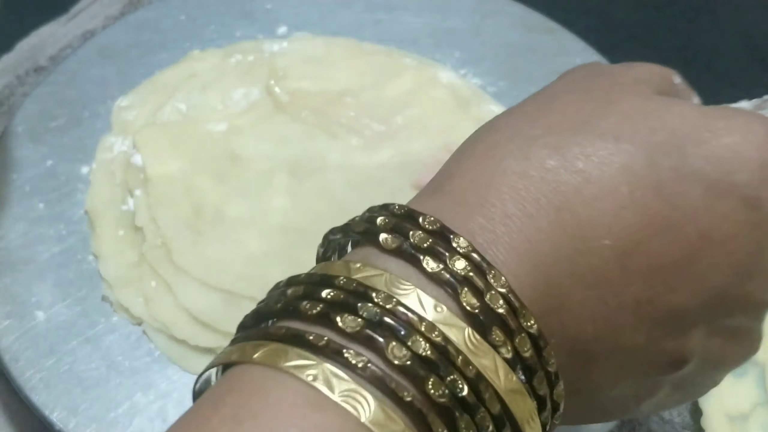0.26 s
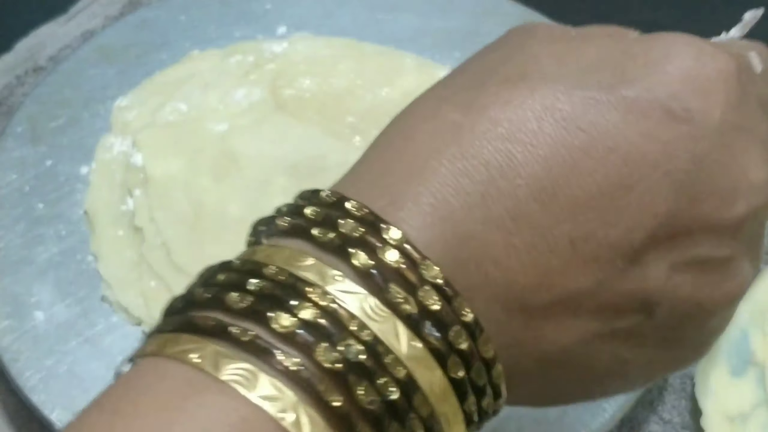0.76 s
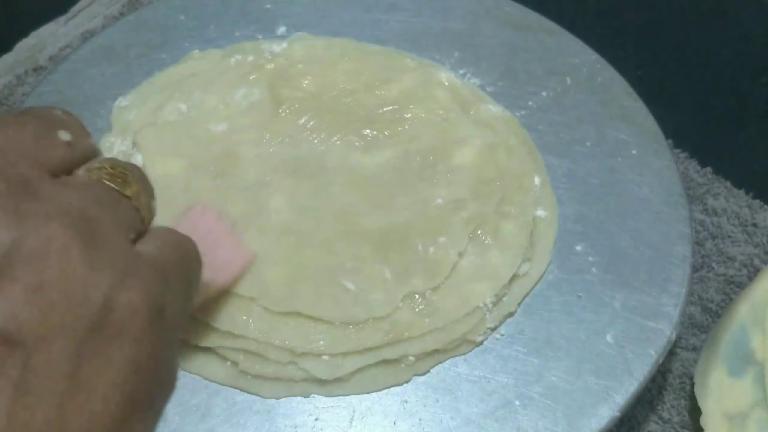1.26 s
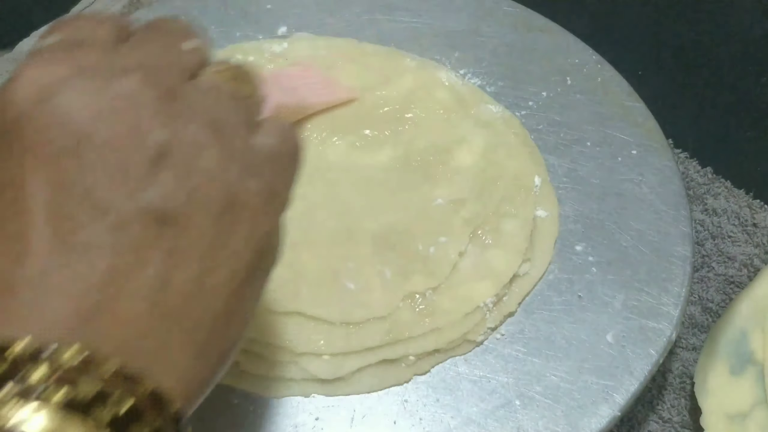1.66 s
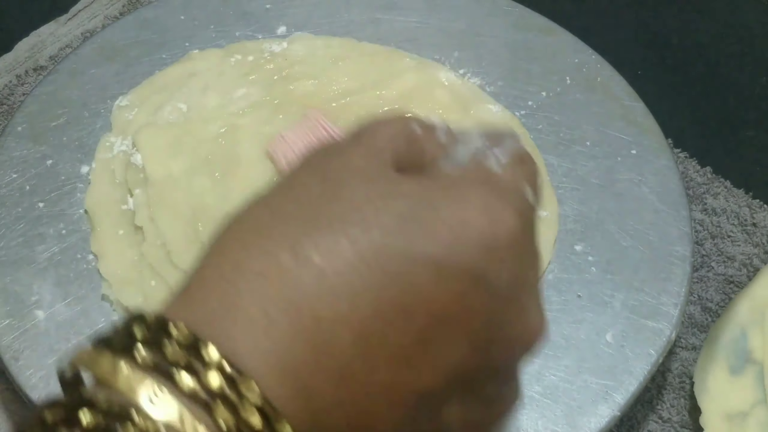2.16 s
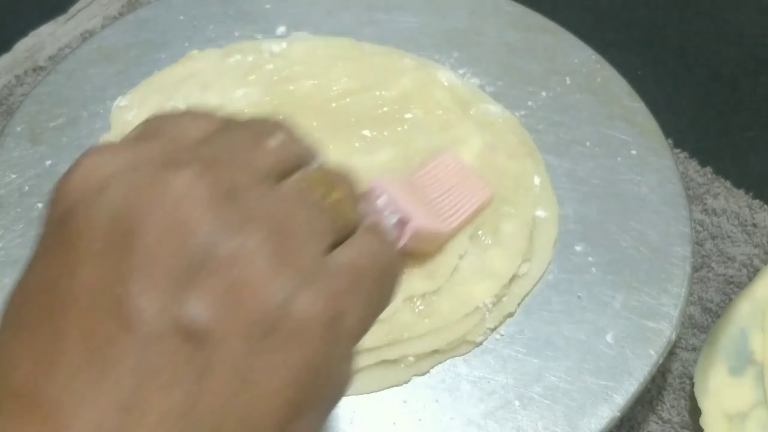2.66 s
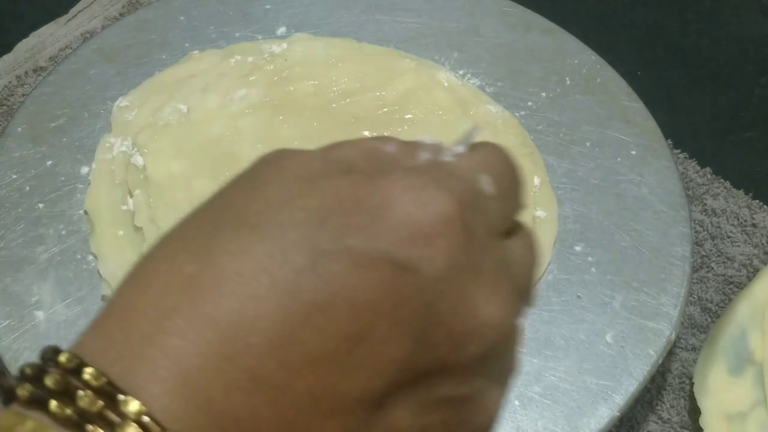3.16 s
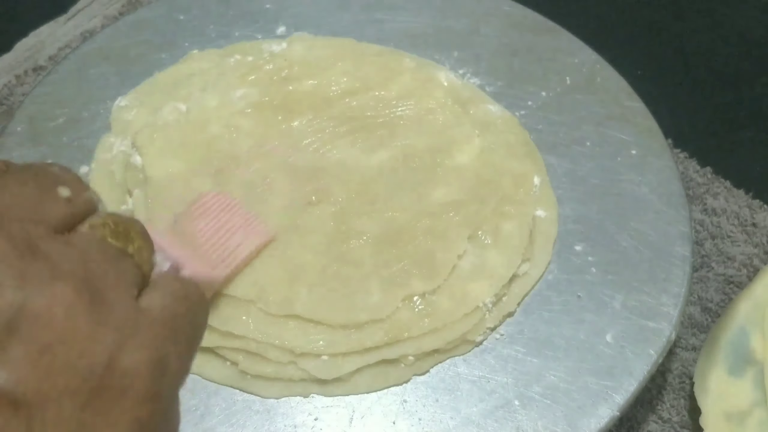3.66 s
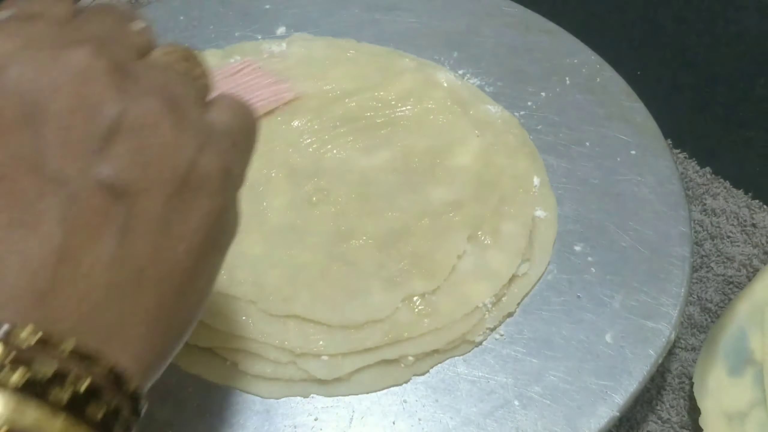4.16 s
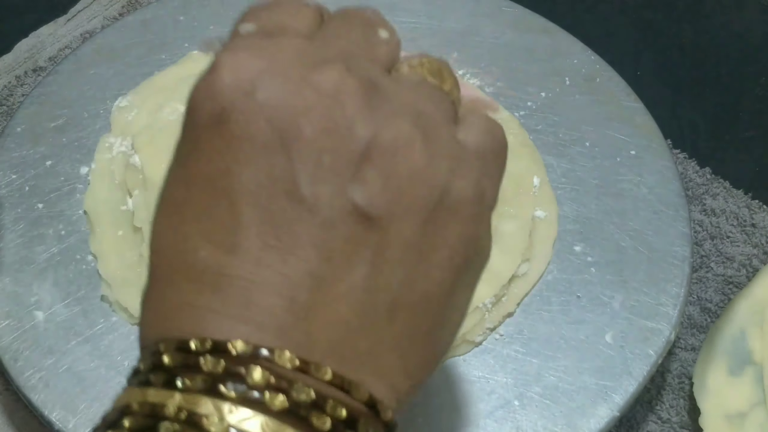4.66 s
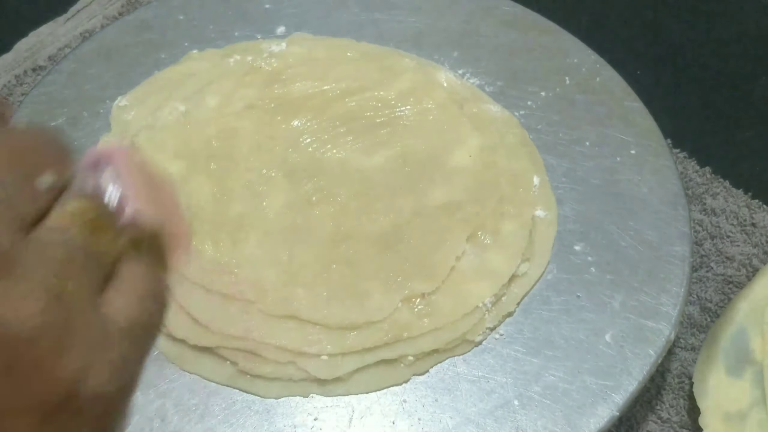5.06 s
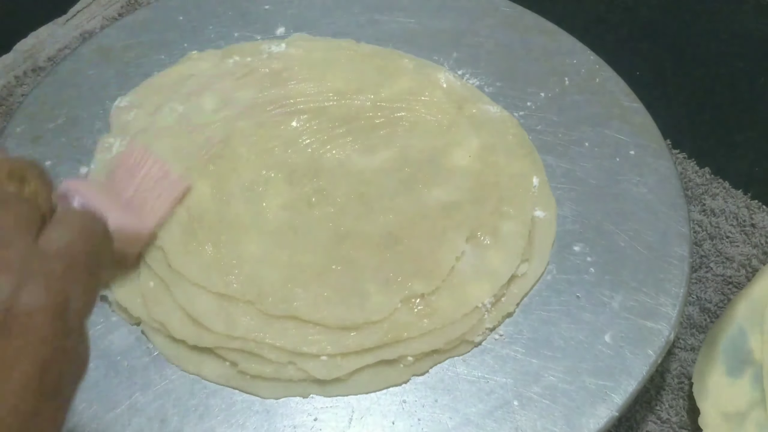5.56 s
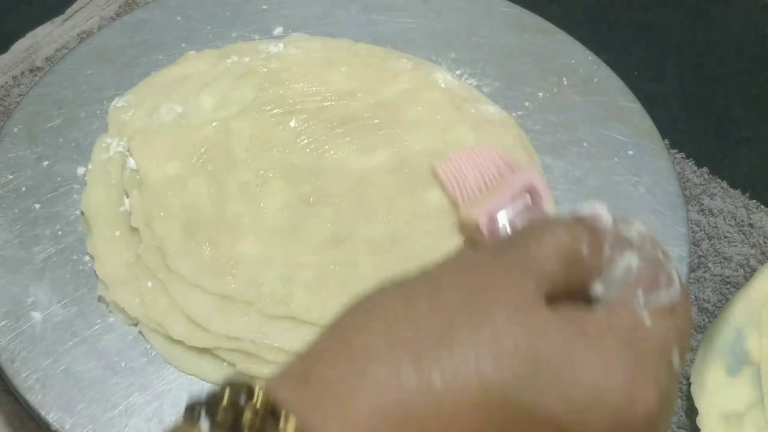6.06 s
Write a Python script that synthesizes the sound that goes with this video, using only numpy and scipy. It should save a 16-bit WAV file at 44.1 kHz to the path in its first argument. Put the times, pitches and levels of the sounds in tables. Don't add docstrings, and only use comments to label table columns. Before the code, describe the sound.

A hand brushes something soft and its stacked bangles clatter in irregular, tight, high metallic clicks, quickly damped by skin. Under them come gentle bristle strokes, occasional dull handle ticks and two soft low bumps on the tray. A quiet outdoor rumble swells and fades with a wavering low drone. Heard close on a phone in a small hard room, left side crisp, right side duller, slightly gated treble.

```python
import sys
import numpy as np
from scipy import signal
from scipy.fft import rfft, irfft, next_fast_len
from scipy.io import wavfile
from scipy.ndimage import uniform_filter1d

SR = 44100
rng = np.random.default_rng(int(sys.argv[2]) if len(sys.argv) > 2 else 0)


def master_out(mix):
    frames = np.transpose(np.atleast_2d(mix))
    ceiling = np.clip(frames, -1, 1)
    pcm = np.round(ceiling * 32767).astype(np.int16)
    wavfile.write(sys.argv[1], SR, pcm)


def magnitude_from_level(level_db):
    exponent = np.asarray(level_db, float) / 20
    return 10 ** exponent


N = 278883

# pitch in Hz, strength in dB per Hz.
RUMBLE_COLOUR = [(20, -13.5), (36, -36.5), (50, -10.5), (105, -2.5), (150, -6.5), (210, -1.5), (300, -12),
                 (400, -7.5), (650, -10), (1300, -21.5), (2500, -31), (5000, -41), (9000, -39.5),
                 (16000, -44)]
RUMBLE_DB = -50.5
# pitch in Hz, likeness from 0 to 1.
RUMBLE_LIKENESS = [(30, 0.74), (90, 0.98), (290, 0.89), (640, 0.53), (1400, 0), (16000, 0.0)]
# pitch in Hz, width in Hz, lift in dB.
ROOM_TONES = [(44, 29, 10.5), (106.7, 10, 5.5), (135.4, 6.8, 9), (182.3, 4.5, 5.5), (209.8, 5.7, 5.5),
              (236.8, 6.5, 8.5), (371, 13, 3.5), (386, 8.2, 3)]
# start in seconds, level in dB over the steady rumble,
# onset in seconds, release in seconds; the "start" is the loudest moment.
TRAFFIC_SWELLS = [
    (0.0, 4, .05, 0.036),
    (0.85, -2, 0.42, .4),
    (2.0, -4, 0.5, 0.53),
    (3.9, -6.5, 1, 0.3),
    (5.6, -1, 0.37, .4),
]
# time in seconds, pitch in Hz, level in dB.
DRONE_PATH = [(0.0, 78.3, -51.5), (0.37, 84.3, -64), (0.95, 88.4, -82), (1.5, 86, -82), (1.85, 86.3, -51.5),
              (2.09, 86.6, -64), (2.55, 83.9, -53.5), (2.8, 81.7, -58), (3.24, 88.9, -63.5),
              (3.48, 83.8, -53.5), (3.6, 77.4, -70), (3.86, 76.6, -55.5), (4.0, 86.7, -54.5),
              (4.35, 87.3, -45.5), (4.66, 87.2, -66.5), (5.0, 87.3, -52.5), (6.0, 85.5, -59),
              (6.32, 86.2, -66)]
DRONE_FLUTTER_DB, DRONE_WAVER = 3.5, 0.026

# loudest moment in seconds, level in dB, onset and release in seconds.
SLEEVE_SHIFTS = [
    (0.0, -60.5, .1, 0.13),
    (2.7, -73, 0.76, 0.12),
    (4.59, -67, 0.21, 0.18),
    (5.61, -65.5, 0.19, 0.28),
]
RUSTLE_REST_DB = -72
# pitch in Hz, strength in dB.
RUSTLE_COLOUR = [(500, -32.5), (1500, -5), (3000, -2), (5500, -7), (8500, -32.5), (20000, -34)]
# start in seconds, peak in dB, pitch in Hz, fall by 60 dB in seconds.
HANDLE_TICKS = [
    (0.0094, -61, 3070, 0.03),
    (2.393, -48, 5370, 0.022),
    (4.498, -46, 3950, 0.093),
    (4.5925, -51, 4100, 0.033),
    (5.7693, -56, 3108, 0.031),
]
# start in seconds, peak in dB, pitch in Hz, fall by 60 dB in seconds.
TRAY_BUMPS = [
    (3.791, -37, 97.4, 0.16),
    (5.981, -43, 96, 0.14),
]

BANGLES = 5
POSES = 4
# pitch in Hz, strength in dB, fall by 60 dB in seconds.
HIGH_MODES = [(10500, -4, .014), (11230, -18.5, 0.0028), (11180, 1.5, 0.024), (11900, -4.5, 0.035),
              (11900, -1.5, 0.012), (12230, -6.5, 0.018), (12500, -7.5, 0.019), (12800, -1.5, 0.026),
              (13300, -7, 0.013), (12480, -13.5, 0.0091), (13760, -3, 0.025), (13450, -7.5, 0.037),
              (14500, -8.5, 0.0099), (15720, 5, .01)]
# pitch in Hz, strength in dB, fall by 60 dB in seconds.
LOW_MODES = [(1990, -10, 0.039), (2330, -12.5, 0.067), (3035, -10, 0.018), (3615, 1.5, 0.0067),
             (4223, -3, 0.027), (4806, -5, 0.048), (5430, 2, 0.061), (5887, 6, 0.053), (6583, 10, 0.011),
             (6900, 2.5, 0.03), (7430, -4.5, 0.026), (8470, -4, 0.0092)]
# start in seconds, peak in dB,
# lower tones in dB against the peak, pitch of the struck bangle in Hz.
SLAMS = [(0.0748, -30.5, -19.5, 10960), (0.357, -25.5, -18, 11170), (0.829, -19.5, -24.5, 11180),
         (1.0237, -20, -29, 11300), (1.3473, -22, -29, 12600), (1.3787, -14.5, -26.5, 11220),
         (1.5592, -14.5, -29, 10500), (1.5878, -23, -20, 11500), (1.5938, -14, -23.5, 12800),
         (1.9513, -14.5, -29.5, 12140), (1.9584, -16, -26, 11900), (2.1489, -18.5, -26, 12300),
         (2.3909, -25.5, -31, 11320), (2.593, -12, -27, 12500), (2.6154, -23, -22.5, 12000),
         (3.083, -21.5, -27.5, 10780), (3.4291, -19.5, -24.5, 13300), (3.4722, -14.5, -23.5, 14500),
         (3.7903, -9.5, -32, 12230), (3.998, -18.5, -28.5, 12600), (4.01, -13.5, -34.5, 15870),
         (4.4797, -15.5, -28, 11100), (4.6354, -21, -29, 10600), (4.6668, -23.5, -22, 12530),
         (4.9396, -25, -24.5, 11030), (5.2777, -20, -29.5, 12970), (5.3125, -23, -21, 11760),
         (5.6824, -11, -29, 11660), (5.937, -17.5, -26.5, 13300), (6.2613, -20.5, -30.5, 11440)]
# start in seconds, peak in dB, #
# lower tones in dB against the peak.
BOUNCES = [(0.3532, -36, -28), (1.0285, -28, -18), (1.3605, -39, -20), (2.1383, -28.5, -25),
           (2.1574, -25, -23), (2.58, -28, -22), (2.5865, -23, -22.5), (2.6129, -21.5, -23.5),
           (3.0923, -27, -22), (3.4347, -17.5, -46), (3.4836, -25, -25), (3.4906, -28, -24),
           (3.4977, -24, -21), (3.749, -27.5, -31), (3.802, -30, -14), (4.006, -18.5, -26),
           (4.0221, -15.5, -25.5), (4.033, -22, -25.5), (4.6707, -25.5, -22), (4.695, -26.5, -21),
           (4.702, -32, -35), (4.9449, -25.5, -33), (5.2863, -26, -19.5), (5.31, -22.5, -28),
           (5.658, -29, -24), (5.6924, -20.5, -20.5), (5.928, -37.5, -16), (5.9429, -27, -26),
           (5.97, -33.5, -17), (6.272, -21.5, -25)]
# start in seconds, peak in dB.
TOUCHES = [(0.0498, -40.5), (0.057, -37), (0.0839, -36), (0.3813, -40), (0.5032, -33.5), (0.523, -38.5),
           (0.604, -28.5), (0.647, -40), (1.011, -31), (1.3942, -30), (1.406, -42), (1.5483, -39),
           (1.873, -41.5), (2.1224, -38), (2.2477, -43), (2.2644, -37.5), (2.571, -35), (2.7846, -36.5),
           (2.7934, -39), (3.152, -45), (3.1874, -35), (3.2833, -34), (3.437, -34), (3.7359, -36.5),
           (3.8145, -47), (4.489, -33), (5.427, -41), (5.4649, -32.5), (5.9212, -34), (5.962, -31),
           (0.102, -55), (0.967, -49), (1.039, -31), (1.3004, -44), (1.8922, -48), (2.0586, -43),
          (2.259, -42), (2.2775, -43), (2.3799, -37), (2.7987, -36), (2.8476, -47), (3.1741, -40),
          (3.208, -45), (3.45, -37), (3.587, -47), (3.6086, -48), (3.7568, -50), (4.4422, -45),
          (4.9236, -48), (4.962, -44), (5.3926, -44), (5.6491, -35)]
TOUCH_LOW_DB, TOUCH_LOW_SLOPE = -22.5, -0.37
SLAM_RING_MS, BOUNCE_RING_MS, TOUCH_RING_MS, RING_SPREAD = 19, 14, 15, 0.19
SNAP_DB, LOW_SNAP_DB, SNAP_S = 1.5, -10, .002
# pitch in Hz, fall by 60 dB in seconds.
KITCHEN_DECAY = [(1000, 1), (5000, 0.57), (10000, 0.26), (16000, 0.5)]

# moment of most pressure in seconds, level in dB, onset and release in seconds.
BRUSH_STROKES = [(0.42, -70, 0.22, 0.08), (0.72, -52, 0.12, 0.077), (1.3, -58, .6, .08),
                 (1.75, -56, 0.25, 0.37), (2.25, -49.5, .1, 0.11), (2.73, -55, .15, 0.15),
                 (3.68, -52.5, 0.14, 0.13), (4.05, -61, 0.17, 0.37), (4.5, -52.5, 0.67, 1),
                 (5.05, -83, 0.46, 0.35), (5.49, -51.5, 0.13, 0.31), (6.05, -56, .11, .23)]
BRUSH_REST_DB = -77.5
# pitch in Hz, strength in dB.
BRUSH_COLOUR = [(1500, -42), (2500, -14.5), (6000, -3.5), (8500, -8), (11000, -8.5), (15000, -2.5),
                (20000, 6)]

# pitch in Hz, strength in dB.
MIC_LEFT = [(20, 0.5), (7000, 0), (8300, 3), (9000, -16), (9800, -4.5), (10400, 6.5), (15500, 9.5),
            (20000, -1)]
# pitch in Hz, strength in dB.
MIC_RIGHT = [(20, 0), (7000, -1), (8300, 2.5), (9200, 0.5), (9850, 0.5), (10400, -7), (12500, -3.5),
             (15500, -11.5), (20000, 23.5)]
TOP_HZ = 15500


def along(table, t):
    s, *columns = np.transpose(table)
    return [np.interp(t, s, c) for c in columns]


def over_hz(table, size):
    hz, value = np.transpose(table)
    bins_hz = np.arange(size // 2 + 1) * SR / size
    return np.interp(np.log(bins_hz + 1), np.log(hz), value)


def colour(x, table):
    size = 2 * next_fast_len(len(x) // 2 + 2048)
    ceps = irfft(np.log(magnitude_from_level(over_hz(table, size))), size)
    ceps[1:size // 2] *= 2
    ceps[size // 2 + 1:] = 0
    response = np.exp(rfft(ceps))
    return irfft(rfft(x, size) * response, size)[:len(x)]


def level(x, db):
    return x * magnitude_from_level(db) / np.sqrt(np.mean(x ** 2))


def walk(rate):
    k = int(SR / rate)
    steps = np.repeat(rng.standard_normal(N // k + 1), k)
    return uniform_filter1d(uniform_filter1d(steps, k), k)[:N]


def strokes(table, rest_db):
    s, db, onset, release = np.transpose(table)[:, :, None]
    t = np.arange(N) / SR - s
    away = np.where(t < 0, -t / np.maximum(onset, .01), t / np.maximum(release, .01))
    power = (magnitude_from_level(db - 12 * away) ** 2).sum(axis=0)
    return np.sqrt(magnitude_from_level(rest_db) ** 2 + power)


def rumble():
    alike = np.clip(over_hz(RUMBLE_LIKENESS, N), 0, 1)
    bins_hz = np.arange(N // 2 + 1) * SR / N
    tones_db = sum(db / (1 + (2 * (bins_hz - hz) / width) ** 2) for hz, width, db in ROOM_TONES)
    mid, side = rfft(rng.standard_normal((2, N))) * magnitude_from_level(over_hz(RUMBLE_COLOUR, N) + tones_db)
    mid = irfft(mid * np.sqrt(1 + alike), N)
    side = irfft(side * np.sqrt(1 - alike), N)
    steady = level(np.array([mid + side, mid - side]), RUMBLE_DB)
    return steady * strokes(TRAFFIC_SWELLS, 0)


def drone():
    hz, db = along(DRONE_PATH, np.arange(N) / SR)
    wavering_hz = hz * (1 + DRONE_WAVER * walk(20))
    tone = np.sin(2 * np.pi * np.cumsum(wavering_hz) / SR)
    return np.sqrt(2) * tone * magnitude_from_level(db + 1.5 + DRONE_FLUTTER_DB * walk(14))


def rustle():
    grain = magnitude_from_level(3 * walk(150) + 1.5 * walk(12))
    hiss = rng.standard_normal((2, N)) * grain
    cloth = np.array([level(colour(h, RUSTLE_COLOUR), 0) for h in hiss])
    return cloth * strokes(SLEEVE_SHIFTS, RUSTLE_REST_DB) * magnitude_from_level(4.5)


def knocks(table, spread):
    out, t = np.zeros(N + SR), np.arange(SR // 4) / SR
    for (s, db, hz, t60), c in zip(table, rng.standard_normal((len(table), 5, 1))):
        tones = np.sin(2 * np.pi * hz * (1 + spread * c) * t).sum(axis=0)
        i = int(s * SR)
        out[i:i + len(t)] += magnitude_from_level(db - 11.5) * tones * np.exp(-np.log(1000) * t / t60)
    return out[:N]


def contacts():
    slam_s, slam_hz = np.transpose(SLAMS)[[0, 3]]

    def near_hz(s):
        return slam_hz[np.abs(slam_s - s).argmin()]

    rows = [(*r, SLAM_RING_MS) for r in SLAMS]
    rows += [(*r, near_hz(r[0]), BOUNCE_RING_MS) for r in BOUNCES]
    for s, db in TOUCHES:
        low_db = TOUCH_LOW_DB + TOUCH_LOW_SLOPE * (db + 38)
        rows.append((s, db, low_db, near_hz(s), TOUCH_RING_MS))
    luck = rng.standard_normal(len(rows))
    return [(*r[:-1], r[-1] * np.exp(RING_SPREAD * g)) for r, g in zip(rows, luck)]


def ring(modes, chance, lift_db, free, scatter_db, detune, snap_db):
    hz, db, t60 = np.tile(np.transpose(modes), BANGLES)[:, :, None]
    t = np.arange(int(.028 * SR)) / SR
    gain = magnitude_from_level(db + np.tile(lift_db, BANGLES)[:, None] + scatter_db * chance[0])
    phase = 2 * np.pi * (hz * (1 + detune * chance[1]) * t + chance[2])
    fade = np.exp(-np.log(1000) * t / (free * t60))
    y = (gain * fade * np.sin(phase)).sum(axis=0)
    y = y * (1 + magnitude_from_level(snap_db) * np.exp(-t / SNAP_S))
    return y * np.minimum(t / 0.0004, 1) / np.sqrt((gain ** 2).sum())


def bangles():
    high, low = BANGLES * len(HIGH_MODES), BANGLES * len(LOW_MODES)
    clinks = contacts()
    chance = rng.standard_normal((len(clinks), 2, 3, high + low, 1))
    chance[:, 1, 1] = chance[:, 0, 1]
    cracks = rng.standard_normal((len(clinks), 2, 256))
    crack_fade = np.exp(-np.arange(256) / (.002 * SR))
    out = np.zeros((POSES, 2, N + SR // 10))
    for k, ((s, db, low_db, hz, ring_ms), c, crack) in enumerate(zip(clinks, chance, cracks)):
        lift_db = 7 * np.exp(-((np.array(HIGH_MODES)[:, 0] - hz) / 300) ** 2)
        free = np.clip(ring_ms / 26, .2, 2)
        for side, (shade_db, lag) in enumerate([(-2.0, 10 // 20), (-16, 10)]):
            bright = ring(HIGH_MODES, c[side, :, :high], lift_db, free,
                          scatter_db=3.0, detune=0.03, snap_db=SNAP_DB)
            dull = ring(LOW_MODES, c[side, :, high:], np.zeros(len(LOW_MODES)), free,
                        scatter_db=1, detune=0.0394, snap_db=LOW_SNAP_DB)
            y = magnitude_from_level(shade_db - 5.5) * bright + magnitude_from_level(low_db + 7.0) * dull
            y[:256] += magnitude_from_level(low_db) * crack[side] * crack_fade
            i = int(s * SR) + lag
            out[k % POSES, side, i:i + len(y)] += magnitude_from_level(db) * y
    return out[:, :, :N].sum(axis=0), out[:, 0, :N]


def kitchen(poses, wet_db, early_db, early_s):
    t = np.arange(int(.5 * SR)) / SR
    decay_hz, decay_s = np.transpose(KITCHEN_DECAY)
    tail = 0
    for lo in 1000 * 2. ** np.arange(0, 4, .5):
        band = signal.butter(2, [lo, lo * np.sqrt(2)], "band", fs=SR, output="sos")
        t60 = np.interp(np.log(lo), np.log(decay_hz), decay_s)
        fade = np.exp(-np.log(1000) * t / t60) + magnitude_from_level(early_db) * np.exp(-t / early_s)
        noise = signal.sosfilt(band, rng.standard_normal((POSES, 2, len(t))))
        tail = tail + noise * fade * np.minimum(t / 0.0013, 1)
    return magnitude_from_level(wet_db) * signal.fftconvolve(poses[:, None], tail, axes=2).sum(axis=0)[:, :N]


def brush():
    slips = magnitude_from_level(3.5 * walk(300) + 1.5 * walk(25))
    hiss = rng.standard_normal((2, N)) * slips
    hiss = np.array([level(colour(h, BRUSH_COLOUR), 0) for h in hiss])
    side_db = np.array([[-2.0], [-9.0]])
    return hiss * strokes(BRUSH_STROKES, BRUSH_REST_DB) * magnitude_from_level(side_db)


def scene():
    clinks, poses = bangles()
    room = kitchen(poses, wet_db=-37, early_db=12.5, early_s=0.0073)
    small = knocks(HANDLE_TICKS, spread=0.134) + knocks(TRAY_BUMPS, spread=0.08)
    return clinks + room + brush() + rustle() + small + drone() + rumble()


def starve(x, margin_db, chance_db):
    spec = signal.stft(x, nperseg=2048, noverlap=1024)[2]
    bands = np.abs(spec[:, 96:736].reshape(2, 80, 8, -1)) ** 2
    band_db = 10 * np.log10(bands.mean(axis=(0, 2)) + 1e-18)
    top_db = band_db.max(axis=0)
    steady = np.diff(top_db, prepend=top_db[0]) < 3
    luck = rng.standard_normal(band_db.shape)[:, ::2]
    luck = np.repeat(luck, 2, axis=1)[:, :len(top_db)]
    floor_db = .7 * top_db + .3 * np.median(top_db) - margin_db
    lost = steady & (band_db + chance_db * luck < floor_db)
    spec[:, 96:736] *= np.repeat(~lost, 8, axis=0)
    return signal.istft(spec, nperseg=2048, noverlap=1024)[1][:, :N]


def band_limit(x):
    return signal.sosfilt(signal.butter(12, 16800, fs=SR, output="sos"), x)


def record(dry):
    x = np.array([colour(dry[0], MIC_LEFT), colour(dry[1], MIC_RIGHT)])
    x = signal.sosfilt(signal.ellip(10, .5, 32, TOP_HZ, fs=SR, output="sos"), x)
    x = starve(x, margin_db=19, chance_db=8)
    return band_limit(x)


dry = scene()
out = record(dry)
master_out(out)
```